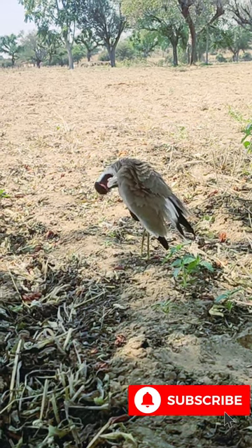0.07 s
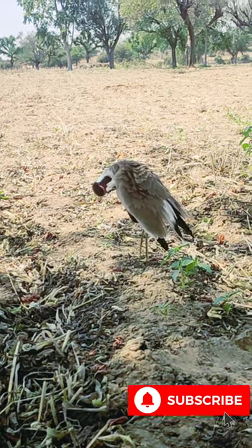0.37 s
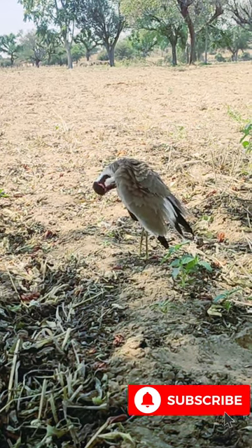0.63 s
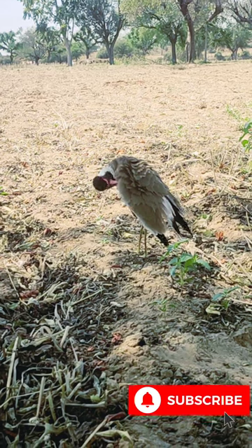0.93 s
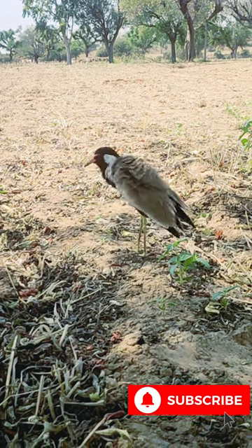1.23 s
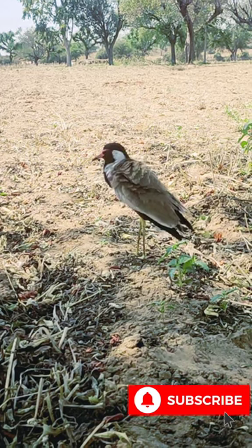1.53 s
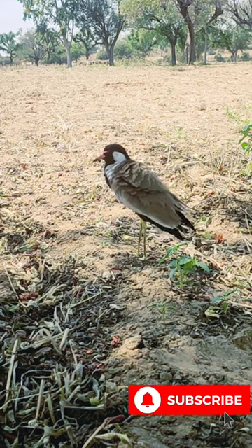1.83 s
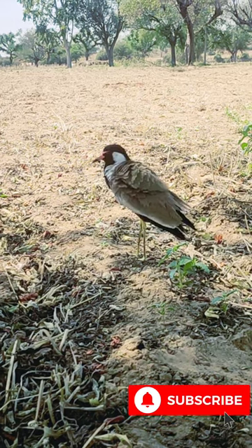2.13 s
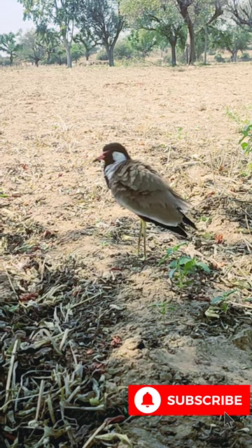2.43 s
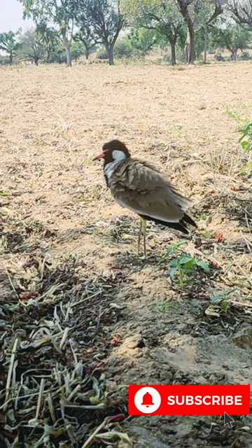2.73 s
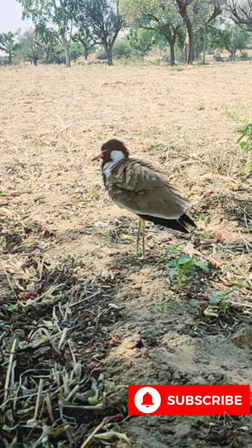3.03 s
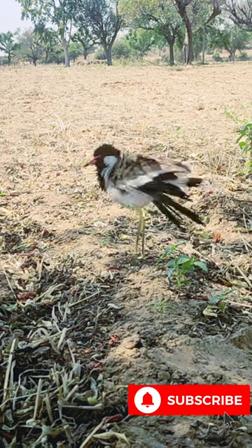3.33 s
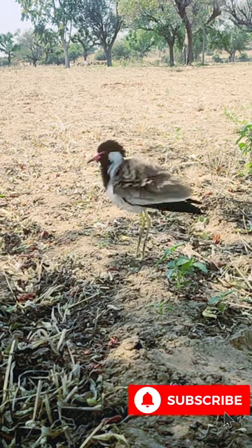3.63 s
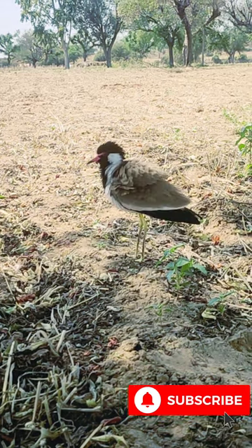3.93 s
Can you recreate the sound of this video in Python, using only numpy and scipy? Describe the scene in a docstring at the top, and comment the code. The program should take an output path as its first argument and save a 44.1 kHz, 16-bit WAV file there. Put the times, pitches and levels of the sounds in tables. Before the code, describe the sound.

Rising bird whistles and chirps outdoors, with a short feather flutter and soft wind.

```python
"""A dry field edged with trees. Small birds sing near-sine notes: rising whistles, hooked chirps and
upslurs, with sparrows, thin piping and a dove further off, all scattered by ground and trees.
A lapwing close by preens, then shakes out its feathers: barbs rub in a short fluttering burst.
Light wind rumbles on each microphone port in turn. Two dull bumps sound before the shake.
Underneath lie a faint hiss and a thin electrical whine."""
import sys
import numpy as np
from scipy import signal
from scipy.fft import rfft, irfft
from scipy.io import wavfile
from scipy.ndimage import uniform_filter1d

SR = 44100
rng = np.random.default_rng(int(sys.argv[2]) if len(sys.argv) > 2 else 0)


def materialize(psi):
    """Save the field psi as 16-bit PCM at rate SR to the path in sys.argv[1].

    A 1-D psi becomes a single channel; in a 2-D psi each row is a channel.
    """
    bounded = np.clip(np.atleast_2d(psi).T, -1, 1)
    quanta = np.round(bounded * 32767).astype(np.int16)
    wavfile.write(sys.argv[1], SR, quanta)


N = 176400
T = np.arange(N) / SR

# Rising whistles: start_s, length_s, start_hz, shelf_hz, top_hz, level_db
WHISTLES = [(1.004, 0.1, 4830, 5480, 6450, -49.5), (1.182, 0.12, 4740, 5440, 6630, -48.5),
            (1.375, 0.11, 4720, 5450, 6510, -49), (1.564, 0.13, 4330, 5160, 6260, -52.5),
            (1.775, .13, 4240, 5224, 6220, -53.5), (1.959, 0.12, 4200, 5190, 6510, -51)]
# Note envelope: length_frac, gain_db
WHISTLE_SWELL = [(0, -12), (.2, -8.5), (.48, -7.5), (.68, -12.5), (1, -12)]
# Fraying of the voice: length_frac, warble_frac
WHISTLE_RASP = [(.52, .005), (.75, .03), (1, .02)]
def whistles(shelf_rise=.0292):
    """Each whistle climbs to a shelf, lingers, then frays as it sweeps up to a thin top."""
    out = np.zeros(N)
    for start_s, length_s, start_hz, shelf_hz, top_hz, level_db in WHISTLES:
        u = progress(length_s)
        corners_hz = [start_hz, shelf_hz * (1 - shelf_rise), shelf_hz * (1 + shelf_rise), top_hz, top_hz]
        pitch_hz = uniform_filter1d(np.interp(u, [0, .27, .58, .84, 1], corners_hz), size=400)
        sing(out, start_s, pitch_hz, level_db + along(WHISTLE_SWELL, u), along(WHISTLE_RASP, u))
    return out


# Chirp contours: length_frac, pitch_ratio, gain_db
HOOK_SHAPE = [(0, .9, -10), (.2, .99, -2), (.5, 1.03, -2), (.62, 1.25, -14), (.74, 1.8, -8), (.86, 1.8, -1),
              (1, 1.64, -1)]
UPSLUR_SHAPE = [(0, .94, -7), (.35, 1, -7.5), (.75, 1.07, -4), (1, 1.4, -13)]
# Chirps: start_s, length_s, pitch_hz, level_db
HOOKS = [(2.148, 0.079, 3890, -64.5), (2.303, 0.079, 3890, -66), (2.464, .078, 3955, -65.5),
         (2.666, 0.055, 3760, -65.5)]
UPSLURS = [(2.794, .047, 5020, -56), (2.941, .051, 4220, -59.5), (3.978, 0.043, 3780, -63)]
def chirps():
    """Hooks leap in pitch and curl back; upslurs rise and fade."""
    return notes(HOOKS, HOOK_SHAPE) + notes(UPSLURS, UPSLUR_SHAPE)


# Barb friction spectrum: freq_hz, gain_db
FEATHER_SPECTRUM = [(350, 9), (600, -3), (1230, -7.5), (2400, -3), (3470, -5.5), (8070, -2), (15500, -10.5)]
# Vigour of the shake: time_s, level_db
SHAKE = [(3.19, -95), (3.245, -55.5), (3.37, -54), (3.435, -50.5), (3.46, -57.5), (3.5, -56.5), (3.6, -75)]
# Flicks and preening ticks: peak_s, level_db, decay_s, treble_db
FLICKS = [(.851, -56, 0.01, 24), (3.2516, -40.5, 0.0019, -0.5), (3.313, -46, 0.0028, 5),
          (3.3733, -41.5, 0.0039, 9), (3.398, -43, 0.003, 2), (3.4429, -43.5, 0.0018, -4),
          (3.485, -47.5, .0022, 11), (3.519, -59, .0018, -1)]
def feathers(snap_rise_s=.00031, brush_rise_s=.0043, brush_db=-9, pivot_hz=5400):
    """Barbs rub in dense tiny clicks; feathers brush together, then snap in each wing or tail flick."""
    barbs = stereo(clicks(per_s=8100, spread_db=1.5), shared_power=.58)
    rub = signal.sosfilt(butter(310, "high"), colour(barbs, FEATHER_SPECTRUM))
    dull = signal.sosfilt(butter(pivot_hz), rub)
    bright = signal.sosfilt(butter(pivot_hz, "high"), rub)
    shaking = (T > SHAKE[0][0]) & (T < SHAKE[-1][0])
    out = rub * from_db(along(SHAKE, T)) * shaking
    for peak_s, level_db, decay_s, treble_db in FLICKS:
        snap = spike(peak_s, snap_rise_s, decay_s)
        brush = from_db(brush_db) * spike(peak_s, brush_rise_s, decay_s)
        out += from_db(level_db) * np.maximum(snap, brush) * unit_rms(dull - from_db(treble_db) * bright)
    return out


# Chips: start_s, length_s, start_hz, end_hz, level_db, warble_frac
CHIPS = [(.53, .014, 4450, 4600, -68.5, 0.011), (.76, 0.044, 5370, 6110, -64, 0.19),
         (.917, 0.081, 5710, 5840, -68.5, 0.081), (1.19, 0.018, 6850, 6040, -64.5, .013),
         (1.296, .05, 1750, 2500, -74, 0.017), (1.322, .034, 4230, 5040, -68, 0.039),
         (1.468, .04, 3150, 3800, -67.5, 0.029), (1.62, 0.036, 4700, 6170, -63.5, 0.2),
         (1.695, .055, 2950, 3350, -67.5, .015), (1.742, .036, 3350, 2900, -67, 0.022),
         (1.772, 0.02, 6230, 8600, -61, 0.164), (2.125, 0.0064, 5770, 4450, -62.5, .01),
         (2.717, 0.03, 6370, 6860, -64.5, 0.092), (3.9, 0.12, 5730, 6330, -70, 0.096)]
def sparrows():
    """Sparrows and other small birds give short warbled glides."""
    return glides(CHIPS)


# Coo contour: length_frac, pitch_ratio, gain_db
COO_SHAPE = [(0, .95, -14), (.2, 1, 0), (.45, 1, 0), (1, .92, -16)]
# Coos: start_s, length_s, pitch_hz, level_db
COOS = [(.57, 0.24, 555, -70.5), (.88, 0.45, 543, -75.5), (1.46, 0.28, 595.5, -69.5),
        (2.15, 0.13, 583, -75)]
def dove():
    """Low coos swell, hold and sag in pitch."""
    return notes(COOS, COO_SHAPE)


# Falling whistle contour: length_frac, pitch_ratio, gain_db
SIGH_SHAPE = [(0, 1, -11), (.22, 1.01, -5), (.33, 1.01, -13), (.45, 1.01, -1), (.7, .94, 0), (1, .84, -5)]
# Falling whistles: start_s, length_s, pitch_hz, level_db
SIGHS = [(.422, .135, 2430, -73.5), (1.066, .124, 2420, -71.5), (1.73, .135, 2390, -70.5)]
# Pure pipes: start_s, length_s, start_hz, end_hz, level_db
PIPES = [(2.875, 0.058, 1840, 1794, -75.5), (2.95, .13, 2620, 2473, -74), (3.15, 0.052, 4560, 4300, -73),
         (3.578, 0.016, 5200, 4350, -73.5)]
def piping():
    """Thin falling notes from birds in the far trees."""
    return notes(SIGHS, SIGH_SHAPE) + glides(PIPES)


def twitter(per_s=24, centre_hz=5000, typical_s=.035):
    """Many faint birds in the trees: short gliding notes at random times and pitches."""
    out = np.zeros(N)
    for height, size, glide, loudness in rng.standard_normal((int(per_s * N / SR), 4)):
        u = progress(typical_s * 2 ** np.clip(size * .5, -1, 1))
        octaves = .37 * np.clip(height, -1, 1) + .169 * glide * (u - .5)
        level_db = -78 + 2.5 * min(loudness, 2) - 10 * (2 * u - 1) ** 2
        sing(out, rng.uniform(0, T[-1]), centre_hz * 2 ** octaves, level_db, warble_frac=.028)
    return out


# Bump spectrum: freq_hz, gain_db
BUMP_SPECTRUM = [(150, 2.5), (800, -13.5), (1200, -26.5), (15000, -31.5)]
# Bumps: peak_s, level_db, half_length_s, left_right_db, cutoff_hz
BUMPS = [(2.757, -53, 0.018, 12, 690), (2.884, -50, 0.0094, 13.5, 11000)]
def bumps():
    """Short, dull noise bursts; a higher cutoff lets more grit through."""
    thud = colour(rng.standard_normal((2, N)), BUMP_SPECTRUM)
    out = np.zeros((2, N))
    for peak_s, level_db, half_length_s, left_right_db, cutoff_hz in BUMPS:
        envelope = from_db(level_db) * pan(left_right_db) * bell(peak_s, half_length_s)
        out += envelope * signal.sosfilt(butter(cutoff_hz), thud)
    return out


# Wind strength per port: time_s, level_db
WIND_LEFT = [(.08, -34.5), (.7, -45.5), (1.5, -39.5), (1.8, -33), (2, -24), (2.17, -27), (2.47, -38.5),
             (2.62, -30.5), (3.13, -35.5), (3.25, -29), (3.5, -34.5), (3.65, -26.5), (3.94, -31)]
WIND_RIGHT = [(.2, -39.5), (.35, -45.5), (.86, -44.5), (0.939, -32.5), (1.15, -35.5), (1.8, -39.5),
              (2.35, -35), (2.6, -42.5), (3.85, -43)]
# Rumble spectrum: freq_hz, gain_db
WIND_SPECTRUM = [(20, 4), (70, -10), (110, -19), (180, -28), (800, -71.5), (4000, -110)]
def wind(lump_db=4, lump_rate_hz=17.6, puff_db=7, puff_rate_hz=10.6, split_hz=97):
    """Lumpy wind rumble, separate at each port; its upper band comes in short puffs."""
    ports = (WIND_LEFT, WIND_RIGHT)
    strength = from_db([along(port, T) + lump_db * np.tanh(drift(lump_rate_hz)) for port in ports])
    rumble = even_noise(WIND_SPECTRUM, window_samples=6000)
    low = signal.sosfiltfilt(butter(split_hz), rumble)
    puffs = from_db([puff_db * np.minimum(drift(puff_rate_hz), 2) for _ in ports])
    return strength * (low + unit_rms(puffs) * (rumble - low))


# Eddy spectrum: freq_hz, gain_db
EDDY_SPECTRUM = [(35, -6.5), (110, 7.5), (300, -13), (600, -28), (1500, -73)]
# Sharp eddies: peak_s, half_length_s, level_db, left_right_db
EDDIES = [(1.127, 0.011, -42.5, -3.5), (1.512, 0.019, -48, -14.5), (1.85, .016, -47.5, 18),
          (2.021, 0.05, -43.5, 23.5), (2.176, 0.013, -48, 19), (3.248, 0.013, -42.5, 18.5),
          (3.383, 0.031, -44, 18), (3.807, 0.051, -48.5, 5.5), (3.926, 0.016, -39, 23.5)]
def eddies():
    """Brief whirls of air thump against one port or the other."""
    whirl = even_noise(EDDY_SPECTRUM, window_samples=int(.03 * SR))
    return whirl * sum(from_db(level_db) * pan(left_right_db) * bell(peak_s, half_length_s)
                       for peak_s, half_length_s, level_db, left_right_db in EDDIES)


# Open-air spectrum: freq_hz, gain_db
AIR_SPECTRUM = [(120, -1), (250, -13), (1000, -26), (6000, -28.5), (12000, -31), (15500, -35)]
def air(level_db=-60):
    """Distant murmur of open air with a faint hiss."""
    noise = stereo(rng.standard_normal((3, N)), shared_power=.15)
    return from_db(level_db) * pan(.4) * colour(noise, AIR_SPECTRUM)


def whine(centre_hz=11516.4, step_hz=599.9, centre_db=-86, fall_db=2):
    """Electrical whine: nine evenly spaced tones, weaker away from the centre."""
    out = np.zeros(N)
    for k in range(-4, 5):
        phase = 2 * np.pi * ((centre_hz + k * step_hz) * T + rng.random())
        out += np.sqrt(2) * from_db(centre_db - fall_db * abs(k)) * np.sin(phase)
    return out


def field(x, wet_db, lag_s=.00018, t60_s=.23, onset_s=.00057):
    """Direct sound plus a dying scatter from ground and trees, different at each port."""
    t = T[:SR]
    tail = rng.standard_normal((2, SR)) * from_db(-60 * t / t60_s) * (1 - np.exp(-t / onset_s))
    tail /= np.sqrt(np.sum(tail ** 2, axis=1, keepdims=True))
    scatter = signal.fftconvolve(x[None], tail, axes=1)[:, :N]
    return delay_left([x, x], lag_s) + from_db(wet_db) * scatter


def sing(out, start_s, pitch_hz, level_db, warble_frac=0, quaver_frac=.004, flutter_db=1.3, rate_hz=140):
    """Add one soft-ended sine note to out, wavering at random in pitch and level."""
    i, n = int(start_s * SR), len(pitch_hz)
    knots = np.arange(n) / SR * rate_hz * 2
    waver, flutter = (np.interp(knots, np.arange(256), row) for row in rng.standard_normal((2, 256)))
    phase = 2 * np.pi * np.cumsum(pitch_hz * (1 + (quaver_frac + warble_frac) * waver)) / SR
    envelope = from_db(level_db + flutter_db * flutter) * signal.windows.tukey(n, .1)
    note = np.sqrt(2) * envelope * np.sin(phase)
    out[i:i + n] += note[:max(N - i, 0)]


def notes(rows, shape):
    """One bird repeats its contour at different pitches and lengths."""
    out = np.zeros(N)
    for start_s, length_s, pitch_hz, level_db in rows:
        u = progress(length_s)
        sing(out, start_s, pitch_hz * along(shape, u), level_db + along(shape, u, column=2))
    return out


def glides(rows):
    """Straight glides that swell and fade; the warble column is optional."""
    out = np.zeros(N)
    for start_s, length_s, start_hz, end_hz, level_db, *warble in rows:
        u = progress(length_s)
        sing(out, start_s, start_hz + (end_hz - start_hz) * u, level_db - 6 * (2 * u - 1) ** 2, *warble)
    return out


def clicks(per_s, spread_db):
    """Three independent streams of uneven clicks."""
    impulses = (rng.random((3, N)) < per_s / SR) * rng.choice([-1, 1], (3, N))
    return impulses * from_db(spread_db * np.minimum(rng.exponential(1, (3, N)), 5))


def colour(x, spectrum, low_cut_hz=14):
    """Apply a smooth spectrum and cut the infrasound; rms 1."""
    hz = np.arange(N // 2 + 1) * SR / N + .0013   # offset avoids log(0)
    points_hz, points_db = np.transpose(spectrum)
    gain = from_db(np.interp(np.log(hz), np.log(points_hz), points_db))
    return unit_rms(irfft(rfft(x) * gain / np.sqrt(1 + (low_cut_hz / hz) ** 6), N))


def even_noise(spectrum, window_samples):
    """Coloured stereo noise divided by its running rms."""
    noise = colour(rng.standard_normal((2, N)), spectrum)
    return noise / np.sqrt(uniform_filter1d(noise ** 2, size=window_samples))


def drift(rate_hz):
    """Slow random wander; rms 1."""
    pole = np.exp(-2 * np.pi * rate_hz / SR)
    return unit_rms(signal.lfilter([1], [1, -2 * pole, pole * pole], rng.standard_normal(N + SR))[SR:])


def stereo(streams, shared_power):
    """Mix one shared stream with one for each side."""
    return np.sqrt(shared_power) * streams[0] + np.sqrt(1 - shared_power) * streams[1:]


def delay_left(x, lag_s):
    """Sound reaches the right port first."""
    return np.array([np.interp(T - lag_s, T, x[0]), x[1]])


def spike(peak_s, rise_s, decay_s):
    return np.exp(np.maximum(np.minimum((T - peak_s) / rise_s, (peak_s - T) / decay_s), -20))


def bell(peak_s, half_length_s):
    return np.exp(-np.minimum(((T - peak_s) / half_length_s) ** 2, 20))


def progress(length_s):
    return np.linspace(0, 1, int(length_s * SR))


def along(rows, at, column=1):
    rows = np.array(rows)
    return np.interp(at, rows[:, 0], rows[:, column])


def butter(cutoff_hz, kind="low"):
    return signal.butter(2, cutoff_hz, kind, fs=SR, output="sos")


def pan(left_right_db):
    return from_db(np.array([[left_right_db], [-left_right_db]]) / 2)


def from_db(db):
    return 10 ** (np.asarray(db) / 20)


def unit_rms(x):
    return x / np.sqrt(np.mean(x ** 2) + 1e-20)


def scene():
    """Air, whine and wind under the close feathers, two bumps and the birds of the field."""
    bed = air() + whine() + wind() + eddies()
    close = delay_left(feathers(), lag_s=.00009) + bumps()
    songs = field(whistles() + chirps() + dove(), wet_db=-3)
    pipers = field(piping(), wet_db=-7, lag_s=.00004)   # almost straight ahead
    chatter = field(sparrows() + twitter(), wet_db=1.5)
    return bed + close + songs + pipers + chatter


def record(dry):
    """Steep low-pass at 15850 Hz."""
    return signal.sosfilt(signal.ellip(12, .1, 80, 15850, fs=SR, output="sos"), dry)


dry = scene()
out = record(dry)
materialize(out)
```